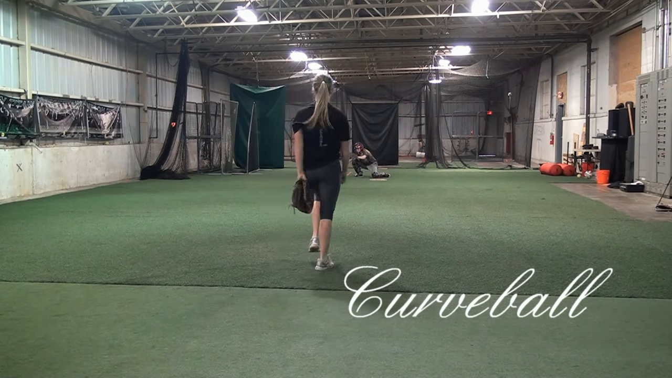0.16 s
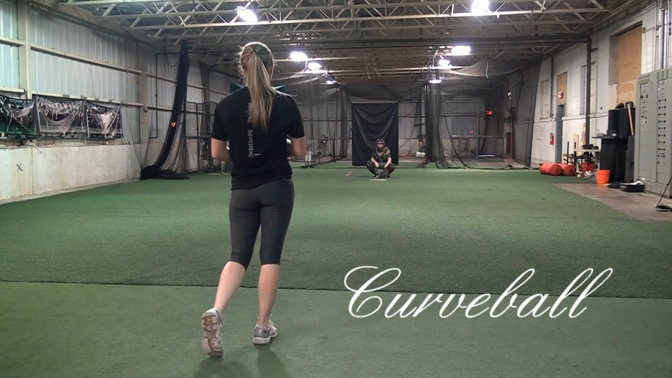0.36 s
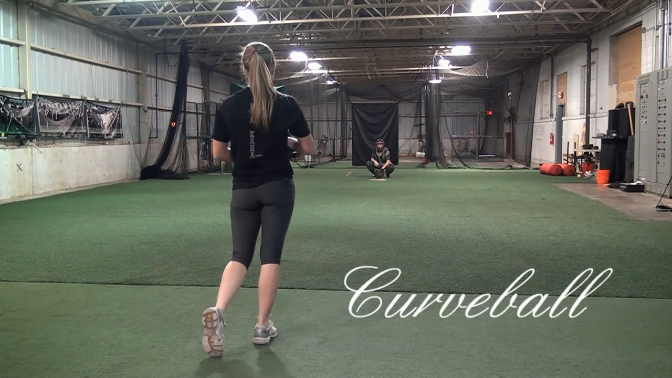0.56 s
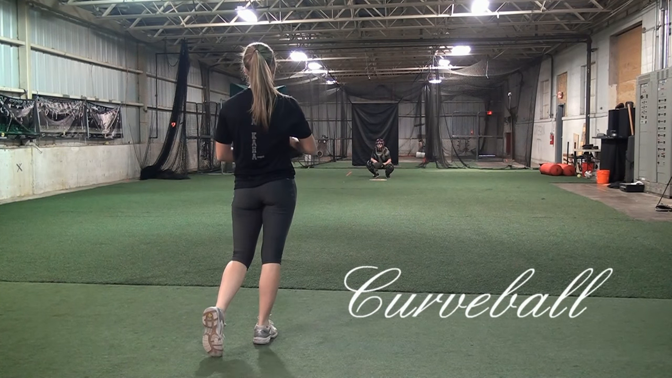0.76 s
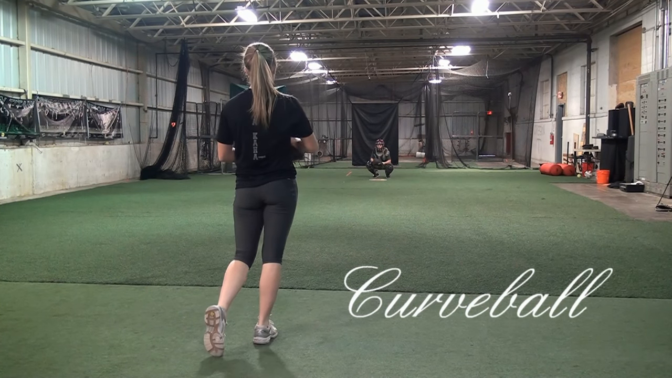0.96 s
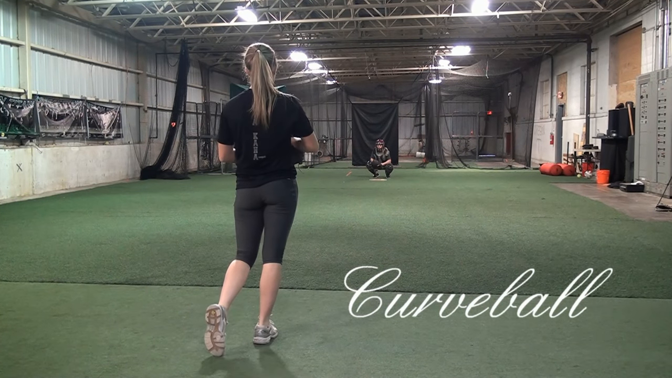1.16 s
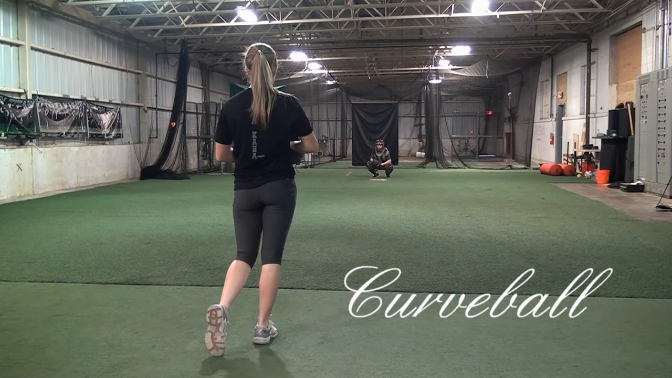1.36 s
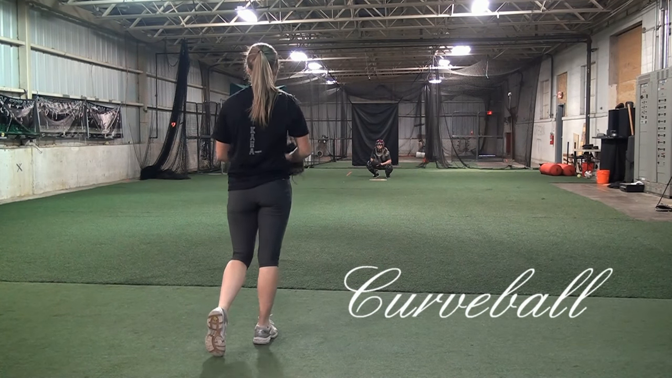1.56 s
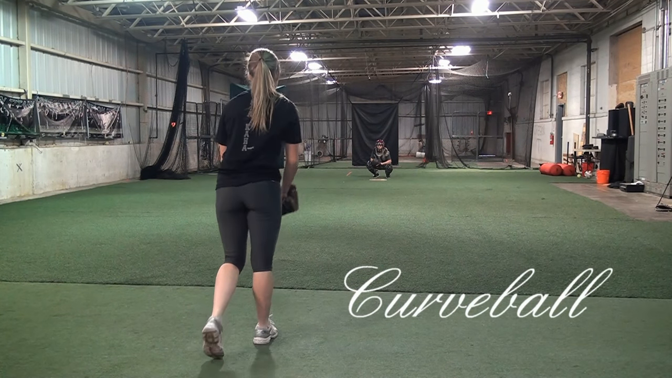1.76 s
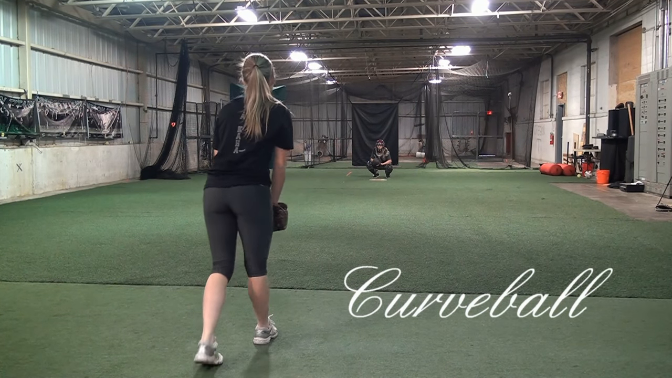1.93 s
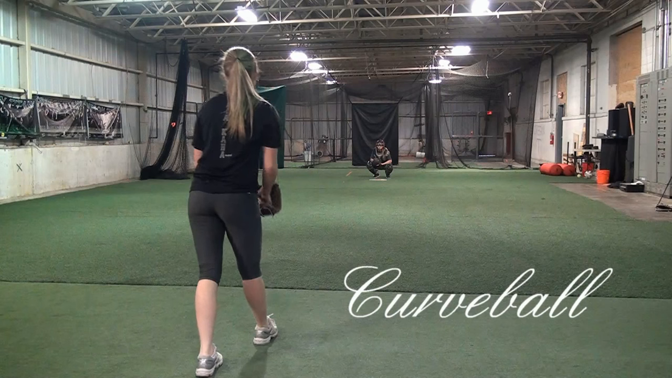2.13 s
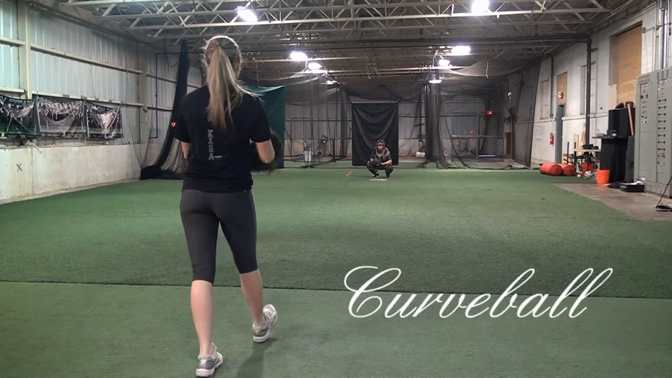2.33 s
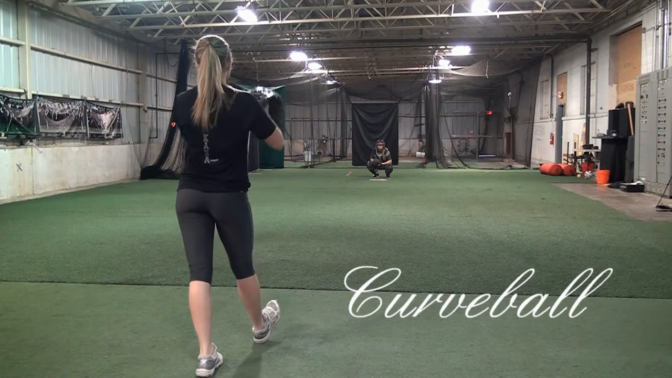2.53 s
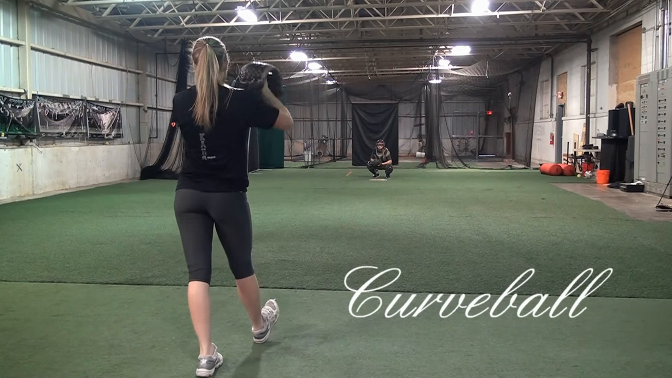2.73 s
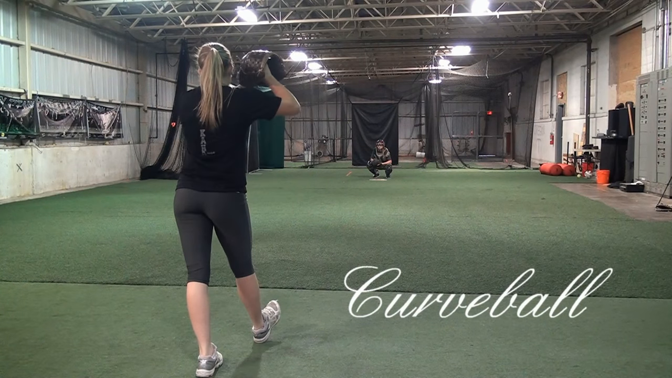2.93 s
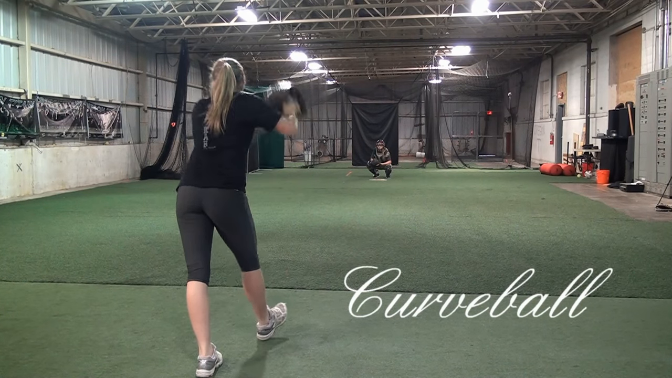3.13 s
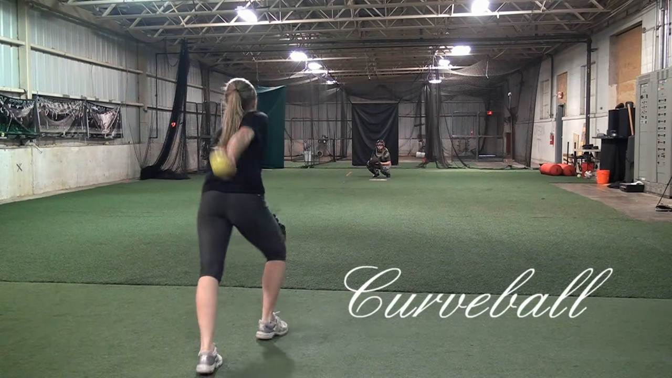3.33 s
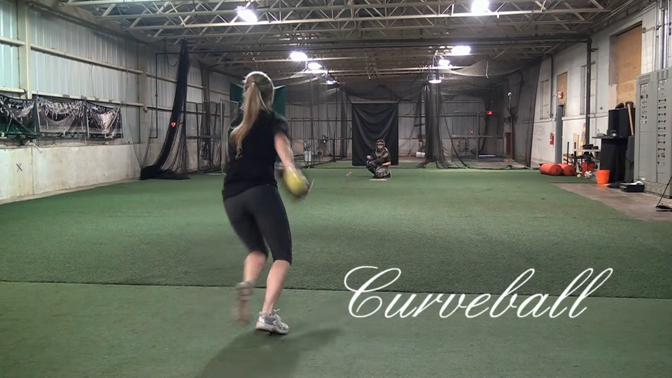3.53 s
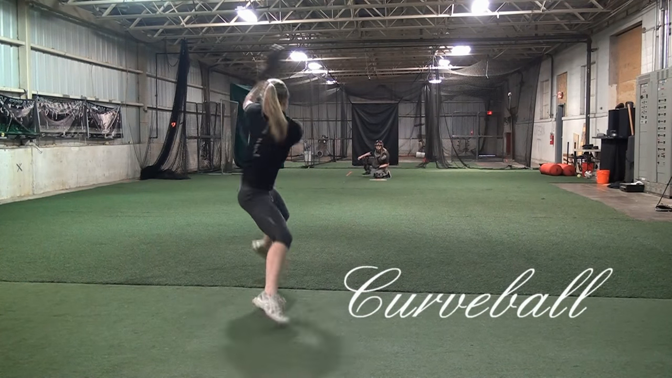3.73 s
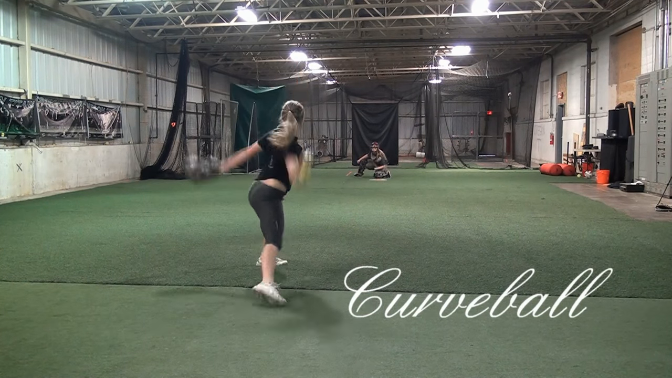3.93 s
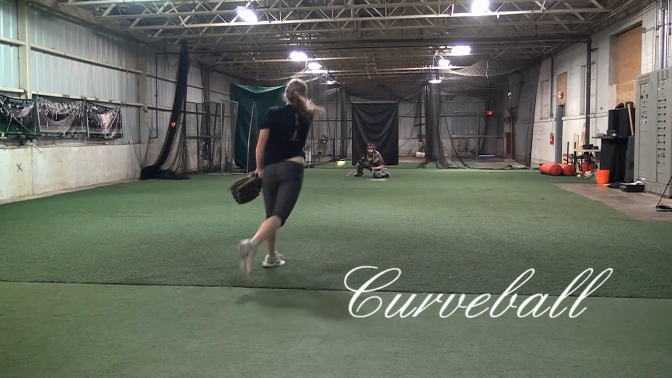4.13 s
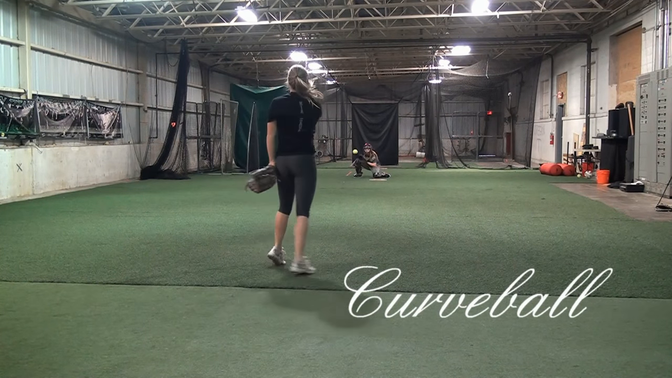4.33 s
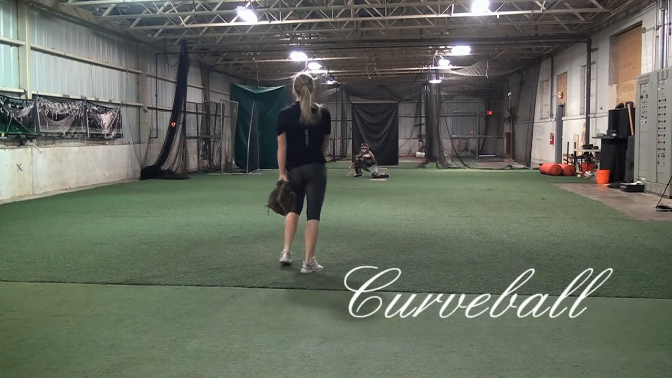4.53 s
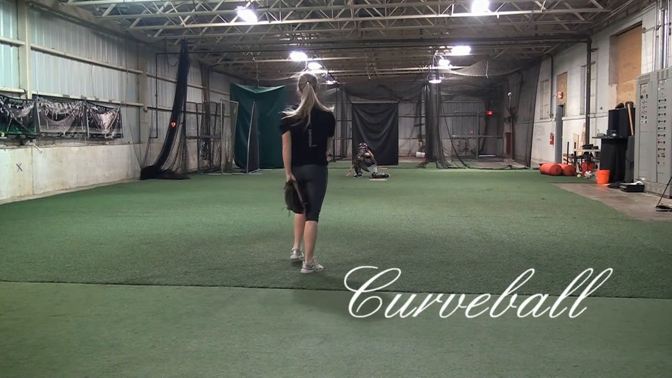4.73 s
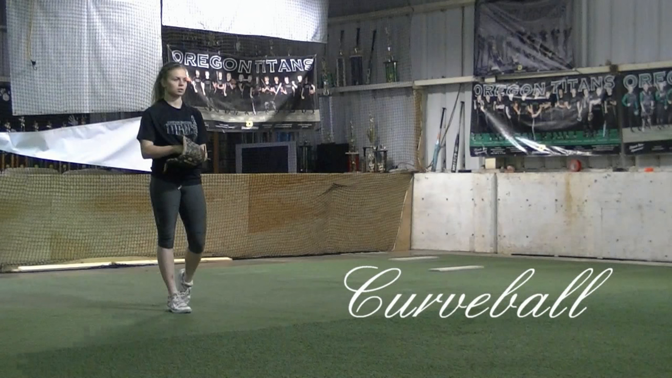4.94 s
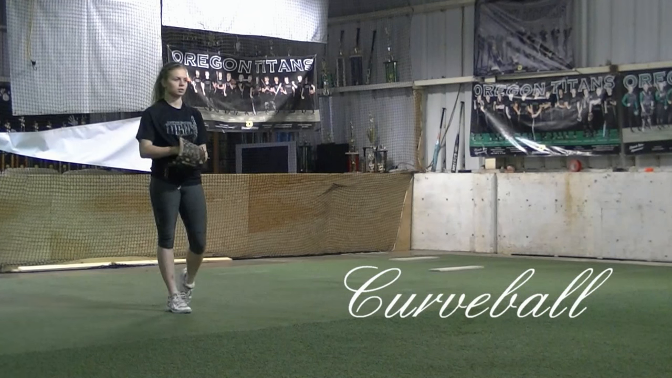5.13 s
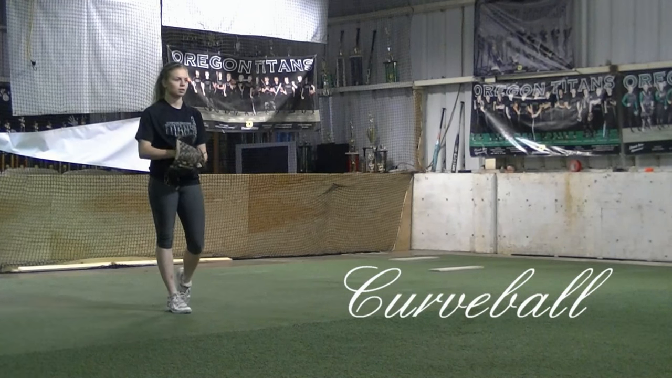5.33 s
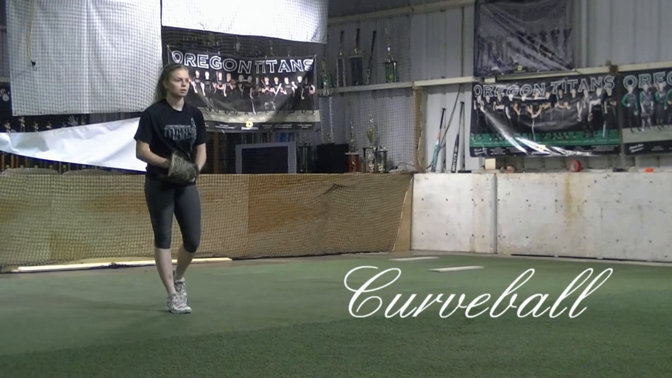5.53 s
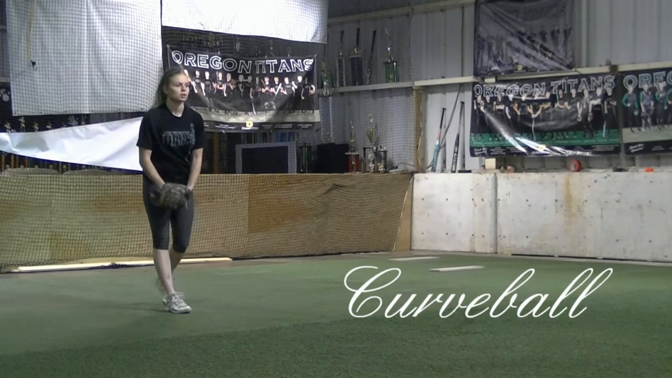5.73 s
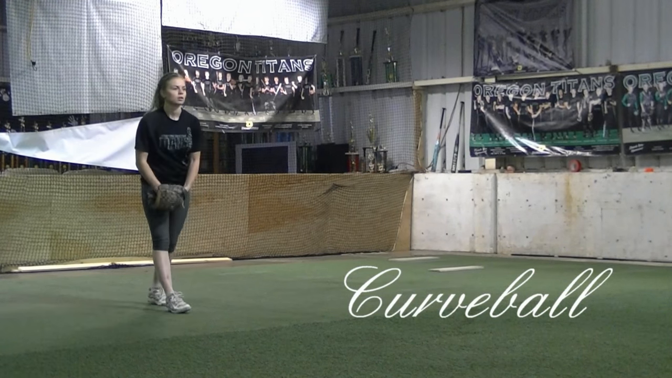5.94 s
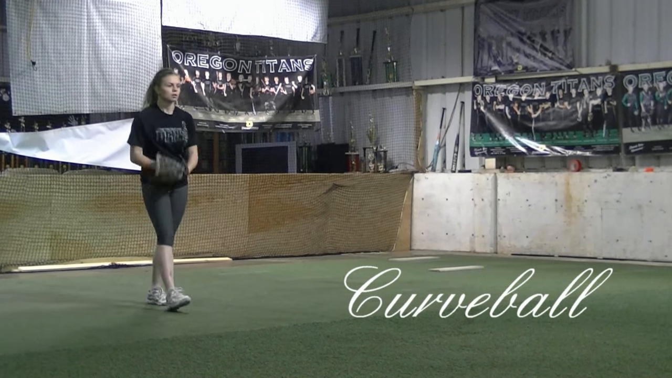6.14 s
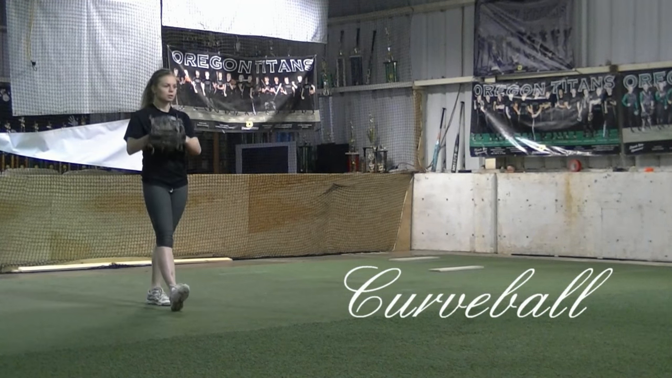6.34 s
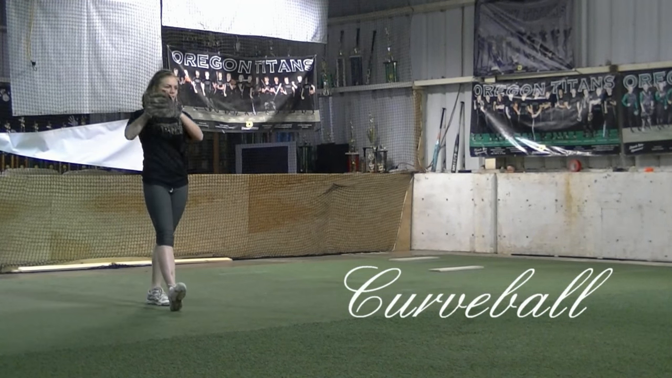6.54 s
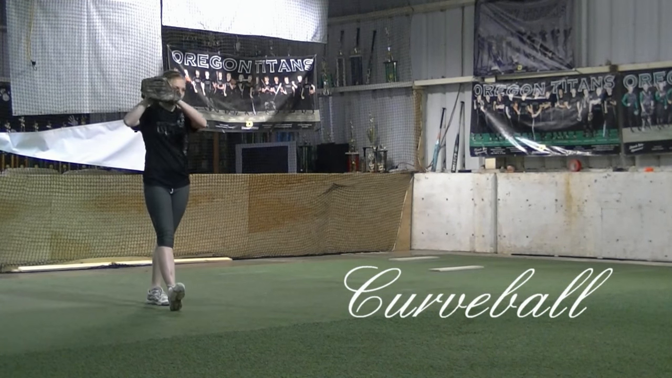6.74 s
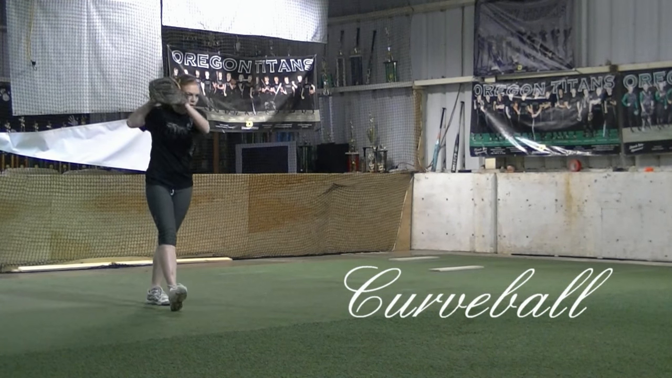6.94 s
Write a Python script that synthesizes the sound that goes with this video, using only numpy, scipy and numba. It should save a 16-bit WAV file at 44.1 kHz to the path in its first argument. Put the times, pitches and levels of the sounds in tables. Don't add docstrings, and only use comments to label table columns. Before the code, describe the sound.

A large metal-walled training hall with steady lamp buzz and a thin high whine. The reverberant tail of an earlier hit is cut off, leaving hum and faint cloth rustles. Then a sharp glove slap, scuffing shoes, a loud foot plant and throw, and a hard ball-in-mitt crack, each with a bright ringing echo. An abrupt cut leaves a much quieter, wider hum with barely audible scuffs. The microphone is near the pitcher, almost mono, with loud peaks compressed.

```python
import sys
import numpy as np
from scipy import signal
from scipy.fft import rfft, irfft
from scipy.io import wavfile
from scipy.ndimage import uniform_filter1d
from numba import njit

SR = 44100
rng = np.random.default_rng(int(sys.argv[2]) if len(sys.argv) > 2 else 0)


def int16_out(signal):
    q = np.round(np.clip(np.atleast_2d(signal).T, -1, 1) * 32767)
    wavfile.write(sys.argv[1], SR, q.astype(np.int16))


def elevation(decibels):
    levels = np.asarray(decibels, float)
    return 10 ** (levels / 20)


N = 312669
SIDES = np.array([[1], [-1]])

# (time [s], time [s])
CUTS_S = (.3875, 4.9925)


def read(table, hz):
    corner_hz, value = np.array(table).T[:2]
    return np.interp(np.log(hz + 1), np.log(corner_hz), value)


def noise(shape, size):
    hz = np.arange(size // 2 + 1) * SR / size
    x = irfft(rfft(rng.standard_normal(size)) * shape(hz), size)
    return x / x.std()


def hump(hz, width_hz):
    return lambda f: 1 / np.sqrt(1 + ((f ** 2 - hz ** 2) / (width_hz * f + 1)) ** 4)


def walk(rate):
    k = int(SR / rate)
    held = np.repeat(rng.standard_normal(N // k + 1), k)
    return uniform_filter1d(uniform_filter1d(held, k), k)[:N]


def add(out, x, s):
    i = int(round(s * SR))
    x = x[max(-i, 0):len(out) - i]
    out[max(i, 0):max(i, 0) + len(x)] += x


def air(table, db):
    return elevation(db + 0.43 * walk(1.8)) * noise(lambda hz: elevation(read(table, hz)), N)


def whine():
    t = np.arange(N) / SR
    beat = 1 + .45 * np.sin(2 * np.pi * 13 * t)
    return elevation(-57.5) * np.sin(2 * np.pi * 15734 * t) * beat


def buzz(lines, weak, scatter_db):
    mains_hz = 59.98
    order = np.arange(1, 137)
    odd_db = -8.5 - 8.6 * np.exp(-order / 25)
    db = read(weak, order * mains_hz) + odd_db * (order % 2)
    db -= 4 * np.abs(rng.standard_normal(len(order)))
    for hz, line_db in lines:
        db[int(round(hz / mains_hz)) - 1] = line_db
    scatter, phase = rng.standard_normal((2, len(order)))
    bins = np.zeros(N // 2 + 1, complex)
    at = np.round(order * mains_hz * N / SR).astype(int)
    bins[at] = elevation(db + scatter_db * scatter) * np.exp(10j * phase)
    waver_db = .5 * walk(7.2) + .5 * walk(43)
    return irfft(bins, N) * N / np.sqrt(2) * elevation(waver_db)


def near_background():
    # (frequency [Hz], level [dB rms])
    strong_lines = [(600, -60), (720, -44), (840, -38.5), (1080, -57.5), (1200, -52), (1320, -50),
                    (1560, -56.5), (1680, -59.5), (1800, -58.5), (2280, -61.5), (2640, -58.5),
                    (3240, -56.5), (3600, -60.5), (4440, -62)]
    # (frequency [Hz], level [dB rms])
    weak_lines = [(250, -75.5), (350, -62.5), (1000, -58), (3200, -63.5), (4900, -62), (5600, -71),
                  (6700, -67), (8200, -83.5)]
    # (frequency [Hz], density [dB per Hz])
    air_colour = [(15, -7.5), (40, -16.5), (90, -23.5), (200, -25.5), (500, -27), (800, -23.5), (1000, -24),
                  (1300, -23.5), (1600, -31.5), (2500, -29), (5000, -32), (8000, -35), (12000, -35.5),
                  (16000, -34)]
    # (frequency [Hz], density [dB per Hz])
    hiss_colour = [(15, 7.5), (100, -5.5), (500, -15), (1000, -20.5), (4000, -22), (7000, -14.5),
                   (14000, -14.5), (16000, -18.5)]
    middle = buzz(strong_lines, weak_lines, 0) + air(air_colour, -46.5) + whine()
    return middle + SIDES * air(hiss_colour, -66)


def wide_background():
    # (frequency [Hz], level [dB rms])
    strong_lines = [(480, -68), (720, -64.5), (840, -61.5), (1200, -67), (1320, -63), (1560, -68),
                    (1800, -66), (1920, -70.5), (2160, -77), (2400, -73), (2760, -71), (3000, -74),
                    (4080, -77), (6600, -76.5)]
    # (frequency [Hz], level [dB rms])
    weak_lines = [(120, -72.5), (250, -71), (380, -75.5), (1000, -74), (3200, -77.5), (5600, -85),
                  (6800, -85.5), (8200, -96)]
    # (frequency [Hz], density [dB per Hz])
    air_colour = [(15, -38), (50, -24), (80, -7), (119, -8.5), (170, -6), (400, -9), (480, -4.5), (840, -9),
                  (1300, -10), (1850, -11), (3500, -21.5), (6670, -25.5), (11000, -29), (16000, -40)]
    # (frequency [Hz], density [dB per Hz])
    side_colour = [(8.8, -80), (15, -50), (469, -3), (770, -10), (840, -13), (917, -8), (1300, -11.5),
                   (1420, -10), (4980, -16.5), (13800, -29), (16000, -61)]
    middle = buzz(strong_lines, weak_lines, 0) + air(air_colour, -61)
    apart = elevation(-2.0) * buzz(strong_lines, weak_lines, 1.0) + air(side_colour, -63.5)
    apart = apart - middle * (apart @ middle) / (middle @ middle)
    return middle + SIDES * (apart + 0.098 * middle)


def hall(colour, build_s, stretch, rings, gap_s=0.0067, grain_db=2.0, smooth_s=0.099, far_db=-16, far_stretch=2.2):
    # (frequency [Hz], T60 [s])
    decay_times = [(100, 1.2), (400, 0.91), (1000, 0.86), (2800, 1.04), (6000, 0.79), (11000, 0.53),
                   (16000, .35)]
    # (frequency [Hz], width [Hz], boost [dB])
    wall_peaks = [(870, 260, 8), (1340, 460, 11), (2520, 190, 7), (3420, 200, 7), (4400, 620, 2.5)]
    size = int(SR * 1.5)
    t, hz = np.arange(size) / SR, np.arange(size // 2 + 1) * SR / size
    boost_db = sum(db / (1 + (2 * (hz - f) / w) ** 2) for f, w, db in wall_peaks + rings)
    wash = rfft(rng.standard_normal(size)) * elevation(read(colour, hz) + boost_db)
    wash /= irfft(wash, size).std()
    out = np.zeros(size)
    centres = np.log2(hz + 1) * 2
    for band in range(12, 30):
        share = np.clip(1 - np.abs(centres - band), 0, 1)
        t60 = stretch * read(decay_times, 2 ** (band / 2))
        decay = elevation(-60 * t / t60) + elevation(far_db - 60 * t / t60 / far_stretch)
        out += irfft(wash * share, size) * decay
    lumps = uniform_filter1d(np.repeat(rng.standard_normal(size // 64 + 1), 64)[:size], 40)
    build = 1 - np.exp(-np.maximum(t - gap_s, 0) / build_s)
    return out * build * elevation(grain_db * lumps * np.exp(-t / smooth_s))


def scuffs(wet_db=-9, grit_db=3.0):
    # (time [s], rise [s], fall [s],
    # level [dB])
    rustles = [(1.875, 0.0088, .015, -50), (1.92, .005, .012, -52), (1.96, .004, .01, -56),
               (2.495, .01, .02, -52), (2.58, .005, .01, -58), (3.32, .02, 0.038, -51.5),
               (3.52, 0.11, 0.028, -40), (3.645, .01, .015, -49.5), (3.70, 0.036, .03, -47.5),
               (3.792, .053, 0.028, -42.5), (3.9, 0.017, 0.019, -35.5), (4.035, 0.015, 0.068, -35.5),
               (4.46, .029, 0.03, -43), (4.659, 0.065, 0.073, -42.5)]
    # (time [s], rise [s], fall [s], level [dB], centre [Hz])
    steps = [(2.2, .18, 0.13, -54.5, 2500), (2.46, 0.054, 0.083, -48, 5900),
             (3.21, 0.025, 0.027, -47, 5650), (3.782, 0.041, 0.068, -42, 4300),
             (3.895, 0.015, 0.034, -27, 1200), (3.897, .015, 0.029, -30, 4490),
             (3.974, 0.049, 0.073, -38, 2810), (4.083, 0.055, 0.024, -29, 2860),
             (4.996, .0018, 0.01, -59, 2585), (5.504, 0.0043, 0.0073, -65, 2900),
             (5.85, 0.057, 0.062, -68, 1500), (6.37, .04, .08, -61, 890), (6.67, .03, .06, -66, 1490)]
    out, t = np.zeros(N), np.arange(-16384, 16384) / SR
    rubs = [row + (12300, 6500) for row in rustles]
    rubs += [row + (1.4 * row[-1],) for row in steps]
    for s, rise, fall, db, hz, width_hz in rubs:
        swell = np.exp(-np.where(t < 0, (t / rise) ** 2, (t / fall) ** 1.5))
        lumps = uniform_filter1d(np.repeat(rng.standard_normal(len(t) // 32), 32), 24)
        grit = elevation(grit_db * lumps)
        add(out, elevation(db) * swell * grit * noise(hump(hz, width_hz), len(t)), s + t[0])
    echo = hall([(100, -6.5), (1000, -5.0), (8000, -5.5), (16000, -12)], 0.069, 0.88, [])
    echo /= np.sqrt(np.sum(echo ** 2))
    return out + elevation(wet_db) * signal.fftconvolve(out, echo)[:N]


def cracks(apart_db=-35):
    # (time [s], level [dB], fade [ms], ring [Hz])
    impacts = [(1.868, -37, 14, 1170), (3.3703, -0.5, 2.6, 2500), (3.372, 4, 3.7, 1387),
               (3.378, 2, .9, 1900), (3.381, -1, 1.5, 1400), (3.3913, -6.5, 1.3, 5900),
               (3.395, -3, 0.48, 1816), (3.404, -20, 0.66, 1500), (4.0962, 3.5, 1.3, 2970),
               (4.097, 1.8, 3.2, 1240), (4.1213, -11.5, .7, 2000), (4.196, -4, 1.7, 3250),
               (4.598, 6, 1.6, 3100), (4.598, 2.5, 1.6, 4800), (4.598, -0.5, 2.1, 1030),
               (4.6107, 0, 2.1, 2930), (4.83, -12, 1.8, 1350)]
    out, side, t = np.zeros(N), np.zeros(N), np.arange(2048) / SR
    ring_share = 0.48
    sheen = hump(8200, 14000)
    for s, db, fade_ms, hz in impacts:
        body = hump(hz, min(2.3 * hz, 4800))
        fade = (1 - np.exp(-t / 0.00013)) * np.exp(-1000 * t / fade_ms)
        slap = fade * noise(lambda f: body(f) + elevation(-40) * sheen(f), len(t))
        slap *= np.sqrt(np.sum(fade ** 2) / np.sum(slap ** 2) / 2)
        ring = fade * np.sin(2 * np.pi * hz * t)
        add(out, elevation(db) * (ring_share * ring + (1 - ring_share) * slap), s)
        add(side, elevation(db + apart_db) * fade * noise(body, len(t)), s)
    return out + SIDES * side


def blows():
    # (time [s], hall level [dB], decay stretch [ratio], thump level [dB])
    strikes = [
        (-.05, -6.5, 1.184, -60),
        (.585, -39.5, 1.16, -64),
        (3.371, -7.5, 0.65, -33),
        (4.095, -5, 0.87, -26.5),
        (4.597, -8, 0.91, -35),
    ]
    # (frequency [Hz], width [Hz])
    leather = [(380, 500), (900, 200), (2000, 1300), (4000, 2400)]
    # (body [dB], pocket [dB], palm [dB], laces [dB])
    ring_levels = [(-1.5, -3.5, 5, -1), (-9, 0, 7, -1), (1, 3.5, 0.5, -4), (-4.5, 9, 4, 1),
                   (0.5, 2, -2.5, 1)]
    # (frequency [Hz], density [dB per Hz])
    blow_colour = [(100, -43.5), (250, -23), (400, -12.5), (1100, -12.5), (3000, -4), (4500, -8),
                   (11000, -25.5), (16000, -36.5)]
    out, side, t = np.zeros(N), np.zeros(N), np.arange(2048) / SR
    for (s, hall_db, stretch, thump_db), ring_db in zip(strikes, ring_levels):
        rings = [part + (db,) for part, db in zip(leather, ring_db)]
        tail = elevation(hall_db) * hall(blow_colour, 0.027, stretch, rings)
        add(out, tail[:int((CUTS_S[s > 0] - s) * SR)], s)
        thump = elevation(thump_db) * np.sin(2 * np.pi * 45 * t) * np.exp(-t / 0.0061)
        add(out, thump, s)
        add(side, -.4 * thump, s)
    return out + SIDES * side + cracks()


def scene():
    t = np.arange(N) / SR
    near = near_background() + blows()
    cut = np.clip((t - CUTS_S[1]) / .001, 0, 1)
    return scuffs() + near * (1 - cut) + wide_background() * cut


@njit
def limiter(x, top, attack, release):
    gain, e = np.empty(len(x)), 0.
    for i in range(len(x)):
        e += (abs(x[i]) - e) * (attack if abs(x[i]) > e else release)
        gain[i] = min(1., top / (e + 1e-9))
    return gain


def band_limit(x):
    return signal.sosfilt(signal.butter(12, 16460, fs=SR, output="sos"), x)


def record(dry):
    gain = limiter(np.abs(dry).max(axis=0), 0.45, 0.01, 0.00042)
    loud = 1.06 * dry * gain
    saturated = loud / (1 + np.abs(loud) ** 6) ** (1 / 6)
    low_pass = signal.ellip(16, .3, 70, 15755, fs=SR, output="sos")
    return band_limit(np.clip(signal.sosfilt(low_pass, saturated), -1, 1))


dry = scene()
out = record(dry)
int16_out(out)
```